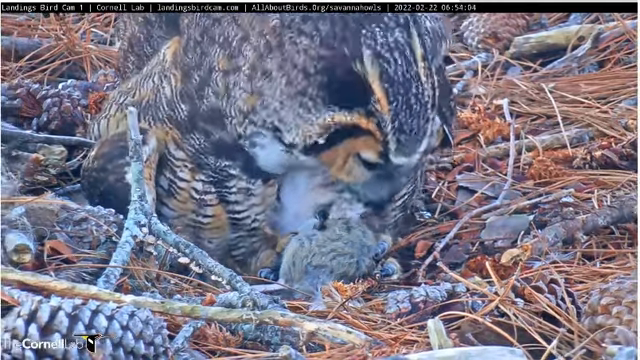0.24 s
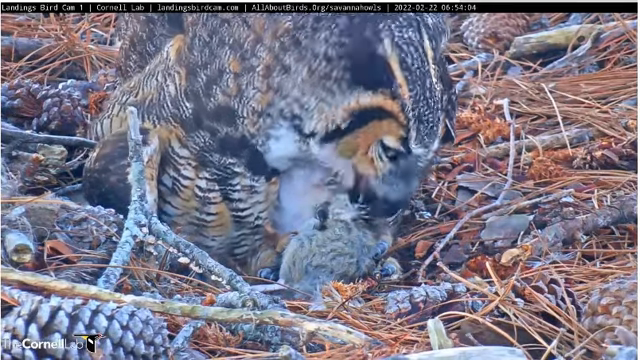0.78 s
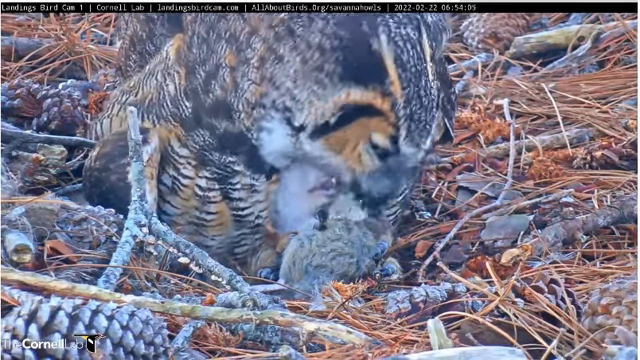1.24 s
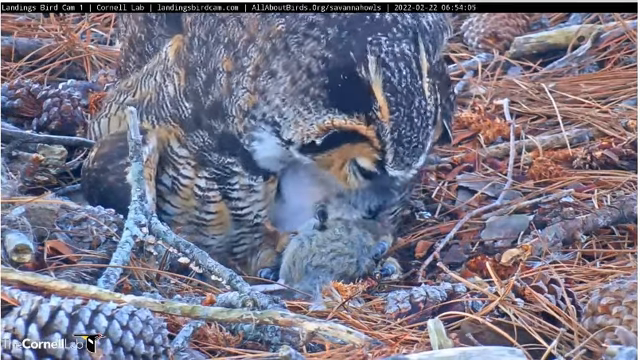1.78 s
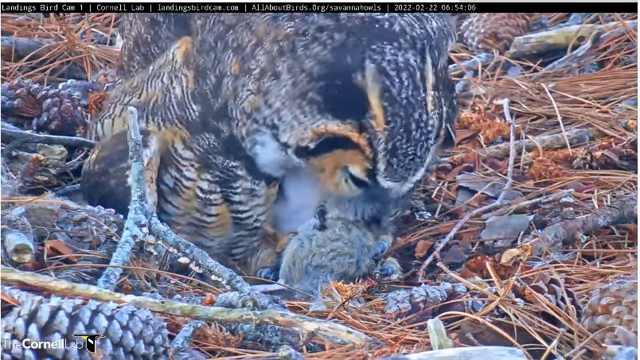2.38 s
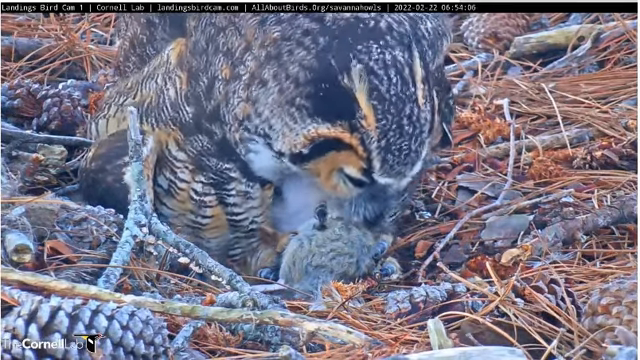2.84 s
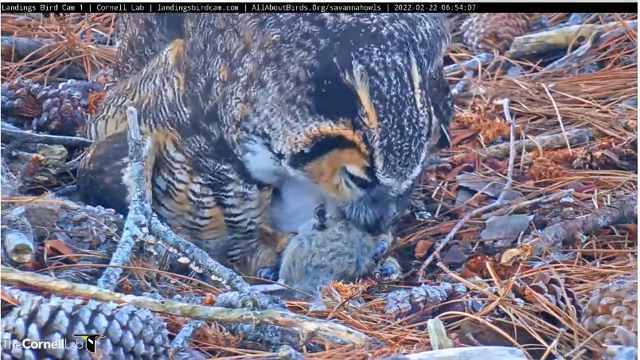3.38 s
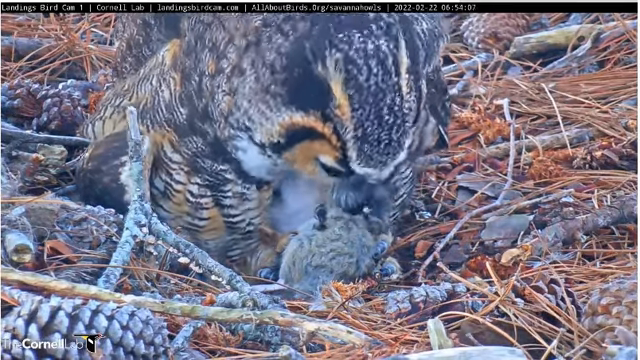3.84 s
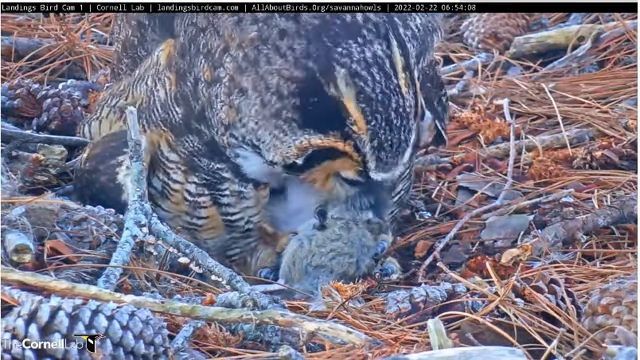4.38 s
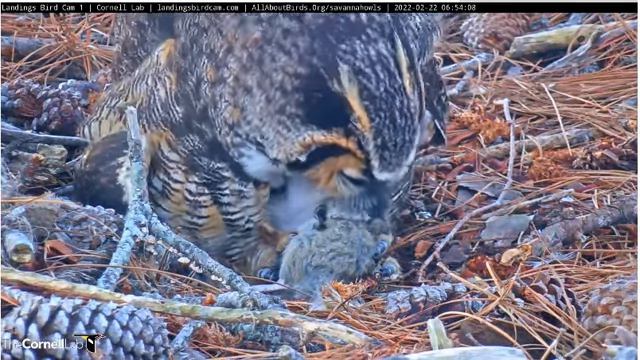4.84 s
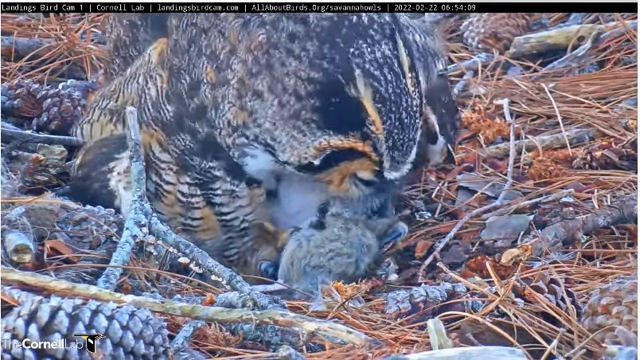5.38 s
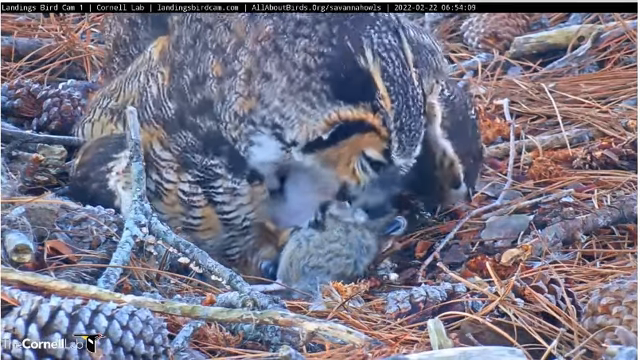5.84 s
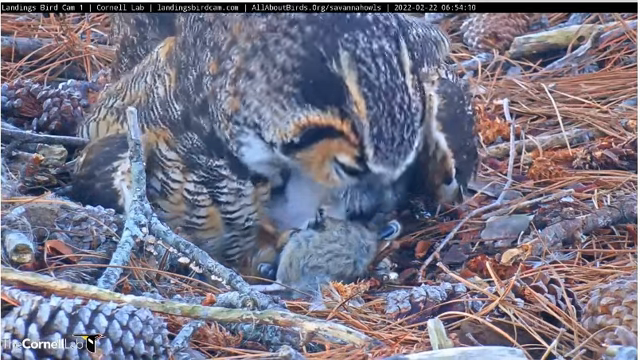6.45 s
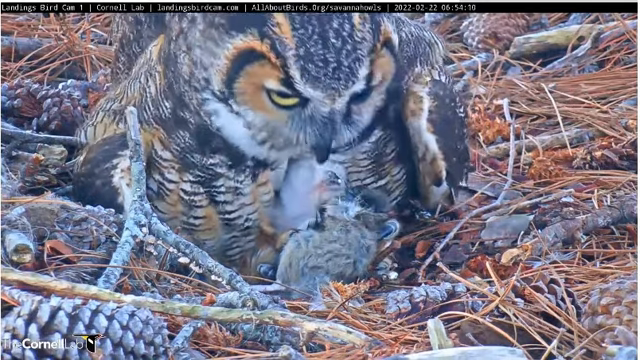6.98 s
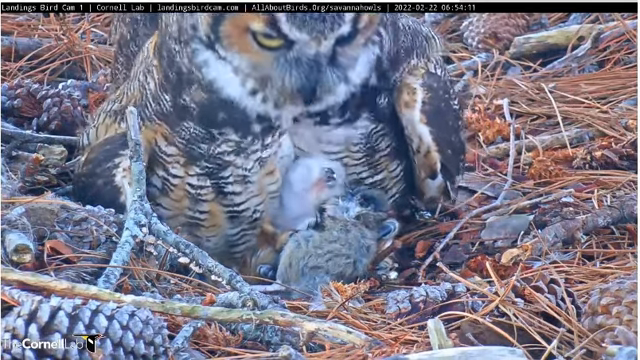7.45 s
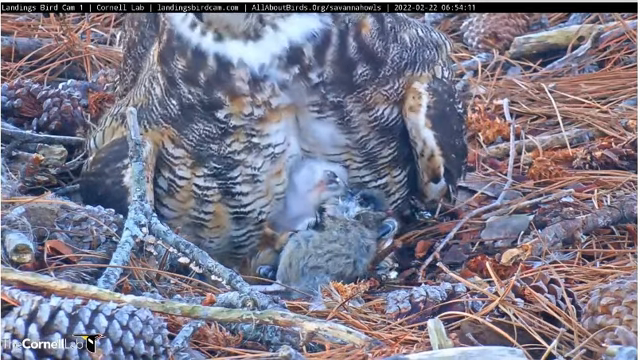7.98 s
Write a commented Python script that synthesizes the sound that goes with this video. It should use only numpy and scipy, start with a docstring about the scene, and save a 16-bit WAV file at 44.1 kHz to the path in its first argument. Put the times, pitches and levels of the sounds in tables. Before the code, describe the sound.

A wood at dawn beside a large owl feeding a chick. From 0 s, sweet drooping whistles near 2.8 kHz overlap faint hoarse lower calls, which return briefly at 1.2 s; thin high notes and level whistles follow up to 2 s. At about 2.1 s a nestling gives a short, harsh, close rasp. From 2.6 to 3.9 s one bird repeats sharp rising chips about every 0.3 s, among whistles and small upward hooks. Around 4.3-4.9 s it thins, with a faint falling glide, then drooping slurs resume from 4.9 to 5.7 s. Whistles thicken after 6 s; a longer, breathier rasp comes at 6.5-6.9 s. Chips return from 7.5 s as whistles continue to the end. Throughout, distant birds blur into echoing twitter over a steady thin high electric whine and faint wind hiss, with occasional tiny dry clicks. Narrow, bass-light sound.

```python
"""A wood at dawn: near birds whistle, slur and chip, a nestling rasps twice close by, a far chorus blurs
among the trees, and an electric drone sings over wind hiss. Near notes are frequency-modulated sines,
rasps are pulsed noise and tones, far birds are crowds of short glides with diffuse echo, the drone is a
sum of steady sines and the wind is shaped noise. Strong treble ducks the whole mix, which then passes
through a narrow band."""
import sys
import numpy as np
from scipy import signal
from scipy.fft import rfft, irfft, next_fast_len
from scipy.io import wavfile
from scipy.ndimage import uniform_filter1d, map_coordinates

SR = 44100
rng = np.random.default_rng(int(sys.argv[2]) if len(sys.argv) > 2 else 0)


def linear_from_db(decibels):
    """Turn decibels (scalar or array-like) into linear amplitude factors; 0 gives 1."""
    return 10 ** (np.asarray(decibels, float) / 20)


def transcribe(u):
    """Save the signal u as a 16-bit wav file named by the first command-line argument.

    u: samples, shape (n,) or (channels, n), limited to [-1, 1]; the rate is SR.
    q: integer samples, one column per channel.
    """
    v = np.clip(np.atleast_2d(u).T, -1, 1)
    q = np.round(v * 32767).astype(np.int16)
    wavfile.write(sys.argv[1], SR, q)


N = 361617  # samples

# near-level whistles: (time [s], length [s], start pitch [Hz], end pitch [Hz], mid-fade level [dB])
LEVEL_WHISTLES = [(0.395, 0.08, 4650, 4530, -57), (0.524, 0.26, 6690, 6870, -73),
                  (0.788, 0.17, 4225, 4175, -44.5), (0.82, 0.16, 4490, 4460, -49.5),
                  (0.858, 0.042, 5340, 5590, -52.5), (1.096, 0.19, 6450, 6260, -59.5),
                  (1.115, 0.14, 4230, 4200, -57), (1.159, 0.26, 3747, 3736, -40),
                  (1.548, 0.059, 5720, 5700, -66), (1.674, 0.19, 3550, 3590, -37.5),
                  (1.825, 0.3, 6600, 6710, -71), (2.31, 0.18, 3970, 3900, -47.5),
                  (2.32, 0.081, 4860, 4560, -58), (2.388, 0.3, 6180, 6110, -70),
                  (2.68, 0.19, 4520, 4510, -51), (2.691, 0.074, 2730, 2700, -41.5),
                  (2.685, 0.18, 3460, 3695, -41.5), (2.901, 0.057, 4500, 4500, -58),
                  (3.058, 0.058, 2730, 2670, -38), (3.141, 0.21, 3440, 3500, -38.5),
                  (3.28, 0.047, 5450, 5400, -61.5), (3.405, 0.071, 2774, 2656, -38.5),
                  (3.524, 0.039, 4600, 4580, -49), (3.632, 0.21, 6790, 6820, -70),
                  (3.9, 0.2, 4500, 4500, -49), (4.152, 0.22, 6420, 6200, -62),
                  (5.36, 0.022, 5200, 5250, -60.5), (7.299, 0.26, 6400, 6560, -76),
                  (5.25, 0.13, 2803, 2765, -32), (5.42, 0.14, 2900, 2826, -42.5),
                  (5.5, 0.066, 2850, 2816, -39), (6.057, 0.071, 3034, 2963, -36.5),
                  (6.25, 0.1, 3010, 2970, -40), (6.245, 0.17, 3895, 3998, -42.5),
                  (6.391, 0.13, 2990, 3048, -34.5), (6.424, 0.19, 4160, 4173, -39),
                  (6.509, 0.2, 3020, 2973, -41.5), (6.862, 0.2, 3806, 3773, -39),
                  (6.896, 0.06, 3000, 3080, -37), (7.092, 0.12, 2955, 2980, -34),
                  (7.093, 0.2, 6370, 6630, -61.5), (7.169, 0.21, 3375, 3605, -38.5),
                  (7.244, 0.22, 3012, 2970, -47), (7.27, 0.23, 4467, 4510, -52),
                  (7.387, 0.14, 3610, 3573, -36.5), (7.62, 0.25, 6120, 6260, -72),
                  (7.716, 0.045, 4720, 4670, -57), (7.825, 0.22, 6830, 6880, -71.5),
                  (8.15, 0.051, 6200, 6150, -68.5), (7.87, 0.2, 4510, 4550, -54.5),
                  (7.993, 0.08, 3590, 3710, -40.5), (8.167, 0.029, 4260, 4430, -48)]
WHISTLE_FADE_DB = 1.5  # lost from start to end
SHIMMER_DB, SHIMMER_HZ = 4, 6500  # the air makes higher notes flutter more: this much at this pitch

# thin notes that scoop up into their pitch:
# (time [s], length [s], start pitch [Hz], end pitch [Hz], starting level [dB]), pitches before the scoop
SCOOPED_NOTES = [(0.985, 0.095, 7150, 7180, -58), (1.44, 0.3, 6420, 6520, -55),
                 (2.52, 0.11, 6850, 6830, -70), (2.925, 0.3, 6280, 6200, -61),
                 (6.46, 0.13, 6550, 6400, -60), (6.94, 0.16, 6240, 6260, -60)]
SCOOP_DEPTH, SCOOP_S, SCOOP_FADE_DB_PER_S = 0.2, 0.006, 50  # share of the pitch; time constant; fading

# falling glides: (time [s], length [s], start pitch [Hz], end pitch [Hz], end level [dB])
FALLING_GLIDES = [(0.162, 0.025, 3185, 2724, -41), (0.266, 0.037, 3560, 3270, -47),
                  (0.941, 0.06, 3580, 3230, -43.5), (1.076, 0.021, 7300, 5760, -56),
                  (1.47, 0.096, 5660, 3970, -56), (2.276, 0.026, 3435, 2860, -39),
                  (4.24, 0.03, 5720, 4200, -59), (4.54, 0.22, 6000, 3300, -54),
                  (5.34, 0.03, 5250, 4300, -58), (5.379, 0.022, 3104, 2666, -33),
                  (6.3, 0.068, 3640, 3168, -44.5), (6.832, 0.03, 6000, 3670, -42.5),
                  (0.117, 0.06, 5200, 3920, -60.5), (0.785, 0.04, 5410, 4360, -58)]
FALL_GROWS_DB_PER_OCTAVE = 17.5  # louder as they fall towards the microphone's strongest range

# short rising hooks, all alike: (time [s], end level [dB])
RISING_HOOKS = [(2.85, -39), (3.119, -43), (3.4, -41.5), (3.68, -41), (4.273, -39), (6.2, -38),
                (7.762, -36.5)]
HOOK_S, HOOK_FROM_HZ, HOOK_TO_HZ, HOOK_GROWS_DB = 0.045, 3650, 3920, 6

# notes that sag slightly, then droop: (time [s], held [s], top pitch [Hz], level [dB], loss by the end [dB])
DROOPING_SLURS = [(-.03, 0.12, 2818, -32.5, 18.5), (0.179, 0.07, 2735, -39, 20.5),
                  (0.379, 0.099, 2767, -32.5, 19), (0.488, 0.059, 2800, -40, 17.5),
                  (0.776, 0.073, 2787, -34, 28), (1.171, .12, 2887, -33, 24), (1.542, 0.12, 2855, -30, 31),
                  (4.904, 0.09, 2801, -34, 26), (5.17, .085, 2785, -32.5, 25), (5.36, .01, 2650, -43.5, 13),
                  (5.595, 0.031, 2782, -29, 26), (6.187, 0.11, 2822, -39, 21.5),
                  (6.78, 0.065, 2724, -36.5, 25.5), (7.132, .13, 2743, -40, 24.5),
                  (7.529, .11, 2756, -39.5, 13)]
DROOP_S, DROOP_TO_HZ, SAG_SHARE = 0.08, 2180, 0.13  # the sag is spread over the whole note

# hoarse arched calls of a larger bird:
# (time [s], length [s], top pitch [Hz], end pitch [Hz], level at the top [dB])
HOARSE_CALLS = [(-.06, .17, 1480, 1300, -43), (.168, .26, 1520, 980, -36.5), (.25, .19, 1820, 1350, -50),
                (1.15, .19, 1270, 1090, -47)]
LOW_RISE_S, LOW_RISE_SHARE, LOW_FADE_DB_PER_S = 0.04, 0.24, 65  # rise time; share of top pitch; fading

# two-part chips: (time [s], relative level [dB])
CHIP_TIMES = [(2.6577, -23), (2.9454, -23.5), (3.2262, -22), (3.5149, -22), (3.8045, -21.5),
              (7.5157, -22.5), (7.7999, -23), (8.0809, -22.5)]
# contours of the rise and the answer in one chip: (time after start [s], pitch [Hz], relative level [dB])
CHIP_RISE_CONTOUR = [(0, 2780, 4), (.006, 3128, 3), (.012, 3270, -6), (.016, 3593, -4), (.023, 4350, -10.5),
                     (.03, 4450, -8)]
CHIP_ANSWER_CONTOUR = [(.062, 3050, -10), (.068, 3100, -23), (.08, 2800, -14)]

# course of each nestling rasp: (time [s], relative level [dB], mouth resonance [Hz], gape brightness [dB])
RASP_COURSES = [
    [(2.095, -44, 3050, -15.5), (2.101, -28, 3100, -11), (2.112, -33, 3306, -10.5),
     (2.127, -25.5, 3000, -19), (2.148, -28, 3280, -16.5), (2.163, -29.5, 3222, -10.5),
     (2.185, -37.5, 3835, -5), (2.25, -49.5, 3700, 8), (2.305, -46.5, 2790, -2.5)],
    [(6.51, -58, 3520, -9.5), (6.58, -39, 3300, -14.5), (6.64, -37, 3280, -9.5), (6.662, -31, 3640, -10),
     (6.7, -28, 3410, -7), (6.74, -25.5, 3594, -7), (6.765, -30, 3845, -9.5), (6.835, -30, 3590, -11),
     (6.87, -52.5, 3100, -11.5)],
]
# weight of the ringing voice in each rasp; low breath takes 1.4 less this weight: [ratio]
VOICED_WEIGHTS = [.85, .4]
# throat response to breath noise: (frequency [Hz], relative level [dB])
THROAT_RESPONSE = [(1290, -55.5), (2200, -32.5), (2470, -43), (2650, -11), (3120, -1), (3660, -2),
                   (4800, -8), (5500, -20.5), (6140, -26.5), (7240, -44), (9410, -70.5), (15900, -120)]

# clicks of twigs and bills: (time [s], relative level [dB])
TICK_TIMES = [(0.8732, -45), (4.7203, -59), (4.9919, -48.5), (5.1147, -57.5), (6.0158, -42.5),
              (7.2937, -47.5), (7.3148, -50.5), (7.5191, -45.5)]

# reverberation time of the trees: (frequency [Hz], fall by 60 dB [s])
TREE_DECAY = [(1000, 0.91), (3000, 0.77), (7000, 0.21)]
ECHO_CHANGES_S = 0.4  # a fresh random echo tail is drawn this often, so the echo stays diffuse

# activity of the far birds: (time [s], chorus level [dB], low call level [dB])
FAR_ACTIVITY = [(0, -40.5, -48), (.2, -47.5, -54.5), (0.549, -49.5, -54), (1, -42, -54),
                (1.35, -46.5, -52.5), (1.7, -43, -56.5), (2.05, -42, -55), (2.501, -44, -62),
                (2.8, -39.5, -58.5), (3.401, -40, -58), (3.9, -40.5, -60.5), (4.3, -45, -51.5),
                (4.799, -48, -57.5), (5.1, -45, -53), (5.502, -46.5, -59.5), (6.002, -41.5, -55),
                (6.448, -39.5, -56), (6.851, -41, -55), (7.25, -39, -59), (7.8, -42.5, -55),
                (8.049, -39.5, -60.5), (8.2, -43.5, -61)]
# activity of the highest crowd: (time [s], level [dB])
HIGH_ACTIVITY = [(0, -65.5), (.7, -65), (.95, -59.5), (1.4, -74.5), (2.5, -75.5), (3, -70), (3.9, -62.5),
                 (4.35, -65.5), (4.7, -66.5), (5.5, -81.5), (6.2, -66.5), (6.5, -72.5), (6.95, -67),
                 (7.1, -61.5), (7.45, -64), (7.7, -67), (8.2, -64)]
HIGH_SWING_DB = 3  # random swing of that level, per unit of the wobble curve
MIDDLE_DB = -8  # birds at middle distance, against the far chorus

DRONE_HZ = 117.5
# tones of the electric drone: (multiple of the hum [ratio], level [dB])
DRONE_PARTIALS = [(4, -75.5), (5, -75), (7, -77.5), (9, -62), (16, -77.5), (20, -62.5), (24, -48.5),
                  (25, -57.5), (28, -69)]
# other steady tones: (frequency [Hz], level [dB])
STEADY_WHINES = [(2745, -52), (3158, -64), (3474, -72.5)]

# spectral shape of wind hiss: (frequency [Hz], relative level [dB])
HISS_SPECTRUM = [(24, -81.5), (40, -52.5), (164, -13), (283, -10.5), (521, -20.5), (581, -22), (754, -26),
                 (1040, -10.5), (1510, -15), (2010, -20.5), (2290, -13.5), (2600, -26.5), (2840, -8),
                 (4490, -23), (7240, -39), (9410, -79), (15900, -120)]
# strength of wind hiss between 150 and 800 Hz: (time [s], level [dB])
WIND_COURSE = [(0, -60), (6.3, -61.5), (6.6, -57), (6.8, -60.5), (8.2, -62)]

SENSE_HZ, SENSE_S, SENSE_DB = 4840, 0.031, -52.5  # gain control: listens above, averages over, starts at
CUT_SLOPE, CUT_S, RECOVER_DB_PER_S = 0.77, 0.018, 29  # dB cut per dB over; onset time constant; recovery
TOP_HZ = 7244  # upper edge of the narrow band


def unit(x):
    """Normalization: scales a signal to rms 1."""
    return x / np.sqrt(np.mean(x ** 2) + 1e-20)


def along(points, hz):
    """Logarithmic frequency scale: interpolates (frequency [Hz], value) points on it."""
    f, v = np.transpose(points)
    return np.interp(np.log(hz + 1), np.log(f + 1), v)


def wobble(rate, size=N):
    """Band-limited fluctuation: a smooth random curve with rate knots a second."""
    knots = rng.standard_normal(int(size * rate / SR) + 4)
    return map_coordinates(knots, [np.arange(size) * rate / SR])


def filtered(x, response):
    """Linear filtering: multiplies the spectrum by a response of frequency."""
    m = next_fast_len(N + 8192)
    return irfft(rfft(x, m) * response(np.fft.rfftfreq(m, 1 / SR)), m)[:N]


def span(length_s):
    """Normalized time: runs from 0 to 1 over a note."""
    return np.linspace(0, 1, round(length_s * SR))


def add(track, s, hz, db, edge, waver, flutter_db, rate=65):
    """Frequency modulation in the syrinx: an unsteady sine along hz and rms db, with soft edges [s]."""
    t, start = np.arange(len(hz)) / SR, round(s * SR)
    soft = np.clip(np.minimum(t, t[-1] - t) / edge, 0, 1) ** 2
    unsteady_hz = hz * (1 + waver * wobble(rate, size=len(t)))
    phase = 2 * np.pi * np.cumsum(unsteady_hz) / SR
    level = linear_from_db(db + flutter_db * wobble(rate, size=len(t)))
    note = np.sqrt(2) * soft * level * np.sin(phase)
    note = note[max(-start, 0):]  # a note may begin before time zero
    spot = track[max(start, 0):][:len(note)]
    spot += note[:len(spot)]


def level_whistles():
    """Nearly pure tones: pitch hardly moves, while flutter grows as the square of pitch."""
    out = np.zeros(N)
    for s, length, hz0, hz1, db in LEVEL_WHISTLES:
        u, shimmer = span(length), (hz0 / SHIMMER_HZ) ** 2
        hz = hz0 + (hz1 - hz0) * u ** 0.8
        fading_db = db + WHISTLE_FADE_DB * (0.5 - u)
        add(out, s, hz, fading_db, min(0.016, length / 4), 0.004 * shimmer, SHIMMER_DB * shimmer, rate=70)
    return out


def scooped_notes():
    """Exponential approach: pitch starts low and relaxes up to its course as the note fades."""
    out = np.zeros(N)
    for s, length, hz0, hz1, db in SCOOPED_NOTES:
        u = span(length)
        scoop = 1 - SCOOP_DEPTH * np.exp(-u * length / SCOOP_S)
        hz = (hz0 + (hz1 - hz0) * u) * scoop
        fading_db = db - SCOOP_FADE_DB_PER_S * u * length
        add(out, s, hz, fading_db, 0.004, waver=0.005, flutter_db=4, rate=75)
    return out


def falling_glides():
    """Geometric frequency sweep: pitch falls by ratios and gains level with each octave down."""
    out = np.zeros(N)
    for s, length, hz0, hz1, db in FALLING_GLIDES:
        hz = hz0 * (hz1 / hz0) ** span(length) ** 0.75
        growing_db = db - FALL_GROWS_DB_PER_OCTAVE * np.log2(hz / hz1)
        add(out, s, hz, growing_db, length / 5, waver=0.008, flutter_db=4, rate=90)
    return out


def rising_hooks():
    """Upward frequency sweep: a short tone climbs quickly, then more slowly, growing as it goes."""
    out, u = np.zeros(N), span(HOOK_S)
    hz = HOOK_FROM_HZ + (HOOK_TO_HZ - HOOK_FROM_HZ) * u ** 0.68
    for s, db in RISING_HOOKS:
        add(out, s, hz, db - HOOK_GROWS_DB * (1 - u), 0.01, waver=0.0025, flutter_db=2.0)
    return out


def drooping_slurs():
    """Coupled pitch and level: a held tone sags slightly, then drops and weakens together."""
    out = np.zeros(N)
    for s, held, top_hz, db, loss_db in DROOPING_SLURS:
        u = span(held + DROOP_S)
        final_drop = np.clip((u * (held + DROOP_S) - held) / DROOP_S, 0, 1) ** 1.15
        droop = SAG_SHARE * u + (1 - SAG_SHARE) * final_drop
        hz = top_hz + (DROOP_TO_HZ - top_hz) * droop
        add(out, s, hz, db - loss_db * droop ** 0.9, 0.016, waver=0.002, flutter_db=1.2 + 3 * droop)
    return out


def hoarse_calls():
    """Random frequency modulation: rapid pitch waver roughens the arched tone of a larger bird."""
    out = np.zeros(N)
    for s, length, top_hz, end_hz, db in HOARSE_CALLS:
        t = span(length) * length
        hz = np.interp(t, [0, LOW_RISE_S, length], [top_hz * (1 - LOW_RISE_SHARE), top_hz, end_hz])
        fading_db = db - LOW_FADE_DB_PER_S * np.maximum(t - LOW_RISE_S, 0)
        add(out, s, hz, fading_db, 0.01, waver=0.024, flutter_db=2.5, rate=200)
    return out


def whistles():
    """Superposition: sums all the tonal notes of the nearer birds except the chips."""
    even = level_whistles() + scooped_notes()
    return even + falling_glides() + rising_hooks() + drooping_slurs() + hoarse_calls()


def chips():
    """Rapid frequency sweep: one bird repeats the same fast rise and short answer."""
    out = np.zeros(N)
    for s, db in CHIP_TIMES:
        for part in CHIP_RISE_CONTOUR, CHIP_ANSWER_CONTOUR:
            after, hz, level = np.transpose(part)
            t = np.arange(after[0], after[-1], 1 / SR)
            part_db = db - 7.5 + np.interp(t, after, level)
            add(out, s + after[0], np.interp(t, after, hz), part_db, 0.003, waver=0.002, flutter_db=1.5)
    return out


def rasps():
    """Source and filter: uneven throat pulses gate breath and a mouth ring; a wider gape frees treble."""
    turns = np.cumsum(150 * (1 + 0.61 * wobble(50))) / SR  # about 150 pulses a second
    pulses = 0.8 + linear_from_db(2.5 * wobble(120)) * np.cos(np.pi * turns) ** 2
    breath = filtered(pulses * rng.standard_normal(N), lambda hz: linear_from_db(along(THROAT_RESPONSE, hz)))
    high = filtered(breath, lambda hz: 1 / (1 + (3900 / (hz + 1)) ** 8))
    low, high = unit(breath - high), unit(high)
    t, out = np.arange(N) / SR, np.zeros(N)
    for rows, voiced in zip(RASP_COURSES, VOICED_WEIGHTS):
        s, db, mouth_hz, bright_db = np.transpose(rows)
        ring_hz = np.interp(t, s, mouth_hz) * (1 + 0.045 * wobble(110))
        phase = 2 * np.pi * np.cumsum(ring_hz) / SR
        ring = unit(pulses * np.sin(phase))
        overtones = unit(pulses * (np.sin(3 * phase / 2) + 0.21 * np.sin(2 * phase)))
        gape = linear_from_db(np.interp(t, s, bright_db))
        treble = gape * (1.6 * high + 0.2 * overtones)
        level = linear_from_db(np.interp(t, s, db, -120, -120))
        out += level * (voiced * ring + (1.4 - voiced) * low + treble)
    return out


def ticks():
    """Impulsive excitation: dry clicks of twigs and bills are decaying noise in a band."""
    out, t = np.zeros(N + SR), np.arange(SR // 50) / SR
    for s, db in TICK_TIMES:
        decay = linear_from_db(db - 2.5 - 60 * t / 0.02)
        out[round(s * SR):][:len(t)] += decay * rng.standard_normal(len(t))
    return filtered(out[:N], lambda hz: 1 / (1 + (4200 / (hz + 1)) ** 6) / (1 + (hz / 6000) ** 6))


def trees(x):
    """Diffuse reverberation: each frequency dies at its own rate, in a fresh random tail per stretch."""
    step, out = round(ECHO_CHANGES_S * SR), np.zeros(N + 2 * SR)
    for start in range(-step, N, step):
        hz, t, z = signal.stft(rng.standard_normal(SR * 3 // 4), SR, nperseg=256)
        decay = linear_from_db(-60 * t / along(TREE_DECAY, hz)[:, None])
        tail = signal.istft(z * decay, SR, nperseg=256)[1]
        k = np.arange(max(start, 0), min(start + 2 * step, N))
        stretch = x[k] * np.sin(np.pi * (k - start) / (2 * step))  # stretches overlap by half
        wet = signal.fftconvolve(stretch, tail / np.linalg.norm(tail))
        out[k[0]:][:len(wet)] += wet
    return out[:N]


def crowd(count, mid_hz, spread, length, glide, direct_db):
    """Incoherent summation: many random short glides blend, direct and echoed, into one crowd of rms 1."""
    out = np.zeros(N)
    traits = rng.standard_normal((count, 4))
    for when, (pitch, life, slope, size) in zip(rng.uniform(0, N / SR, count), traits):
        u = np.linspace(-0.5, 0.5, round(length * np.exp(0.4 * life) * SR) + 99)
        spot = out[round(when * SR):][:len(u)]
        hz = mid_hz * np.exp(spread * pitch + glide * slope * u)
        gain = linear_from_db(2 * size - 2.5 * pitch ** 2)  # the microphone favours mid-range: outlying pitches quieter
        call = gain * np.cos(np.pi * u) * np.sin(2 * np.pi * np.cumsum(hz) / SR)
        spot += call[:len(spot)]
    return unit(linear_from_db(direct_db) * out + trees(out))


def far_birds():
    """Amplitude modulation: four crowds of birds swell and thin with their activity."""
    t, (s, *levels) = np.arange(N) / SR, np.transpose(FAR_ACTIVITY)
    chorus_db, low_db = (np.interp(t, s, v) for v in levels)
    high_db = np.interp(t, *np.transpose(HIGH_ACTIVITY)) + HIGH_SWING_DB * wobble(8.6)
    low = crowd(count=1000, mid_hz=1080, spread=0.13, length=0.018, glide=0.1, direct_db=-2)
    chorus = crowd(count=3500, mid_hz=3150, spread=0.18, length=0.014, glide=0.08, direct_db=0)
    middle = crowd(count=160, mid_hz=3300, spread=0.16, length=0.045, glide=0.12, direct_db=1)
    high = crowd(count=2500, mid_hz=5100, spread=0.1, length=0.01, glide=0.1, direct_db=-3)
    low *= linear_from_db(low_db + 2.5 * wobble(9))
    return low + linear_from_db(chorus_db) * chorus + linear_from_db(chorus_db + MIDDLE_DB) * middle + linear_from_db(high_db) * high


def drone():
    """Harmonic series: multiples of one wavering electric hum, joined by independent whines."""
    t = np.arange(N) / SR
    turns = DRONE_HZ * np.cumsum(1 + 0.000462 * wobble(0.7)) / SR
    hum, whine = np.zeros(N), np.zeros(N)
    for k, db in DRONE_PARTIALS:
        hum += linear_from_db(db + 0.69 * wobble(3.7)) * np.sin(2 * np.pi * (k * turns + rng.random()))
    for hz, db in STEADY_WHINES:
        whine += linear_from_db(db + 0.5 * wobble(5)) * np.sin(2 * np.pi * hz * t + 1.4 * wobble(5.7))
    return np.sqrt(2) * (hum + whine)


def wind_hiss():
    """Shaped broadband noise: a fixed wind spectrum whose level drifts and flutters."""
    hiss = filtered(rng.standard_normal(N), lambda hz: linear_from_db(along(HISS_SPECTRUM, hz)))
    hiss /= np.std(filtered(hiss, lambda hz: (hz > 150) & (hz < 800)))
    wind_db = np.interp(np.arange(N) / SR, *np.transpose(WIND_COURSE))
    return linear_from_db(wind_db + 1.1 * wobble(8)) * hiss


def gain_control(x):
    """Dynamic compression: strong treble cuts the whole signal with a lag; gain recovers steadily."""
    treble = filtered(x, lambda hz: 1 / (1 + (SENSE_HZ / (hz + 1)) ** 16))
    power = np.abs(uniform_filter1d(treble ** 2, size=round(SENSE_S * SR)))
    level_db = 10 * np.log10(power + 1e-12)
    wanted_db = CUT_SLOPE * np.maximum(level_db - SENSE_DB, 0)
    recovery = RECOVER_DB_PER_S * np.arange(N) / SR
    cut_db = np.maximum.accumulate(wanted_db + recovery) - recovery  # peak hold with a steady release
    keep = np.exp(-1 / (CUT_S * SR))
    return x * linear_from_db(-signal.lfilter([1 - keep], [1, -keep], cut_db))


def scene():
    """Direct and reverberant fields: near birds with echo, the nestling nearly dry, then far layers."""
    song, near = whistles() + chips(), rasps() + ticks()
    close = song + linear_from_db(-8) * trees(song) + near + linear_from_db(-14) * trees(near)
    return (close + far_birds() + drone() + wind_hiss())[None]


def band_limit(x):
    """A steep low-pass at the top of the band."""
    return signal.sosfilt(signal.butter(12, 7390, fs=SR, output="sos"), x)


def record(dry):
    """Band limitation: gain control, then a link with cut bass and a steep top; converter noise remains."""
    controlled = gain_control(dry[0])
    narrow = filtered(controlled, lambda hz: 1 / (1 + (hz / TOP_HZ) ** 60) / (1 + (60 / (hz + 1)) ** 4))
    mix = (narrow + linear_from_db(-84.5) * rng.standard_normal(N))[None]
    return band_limit(mix)


dry = scene()
out = record(dry)
transcribe(out)
```